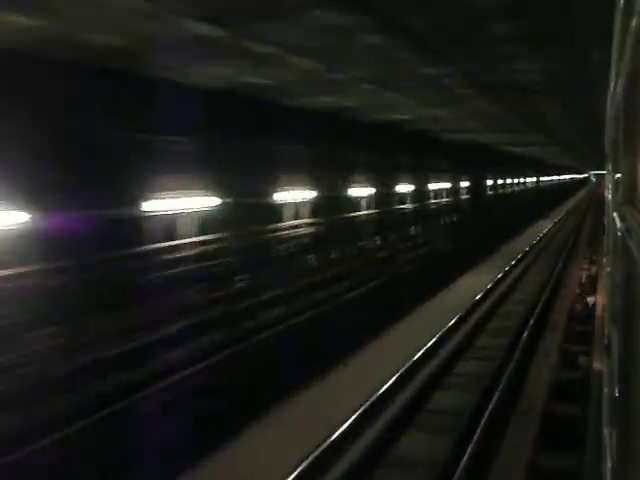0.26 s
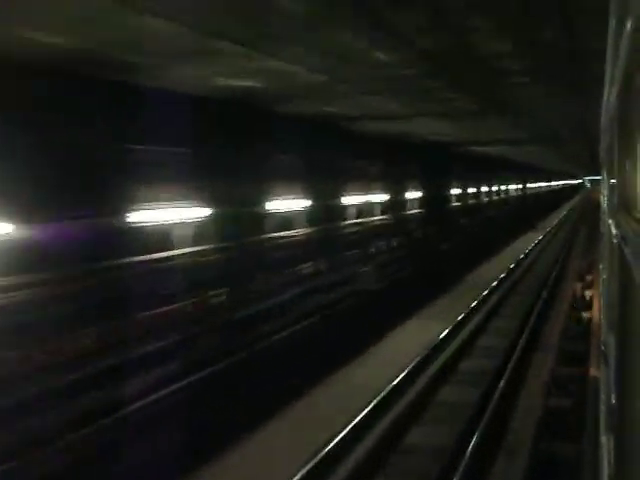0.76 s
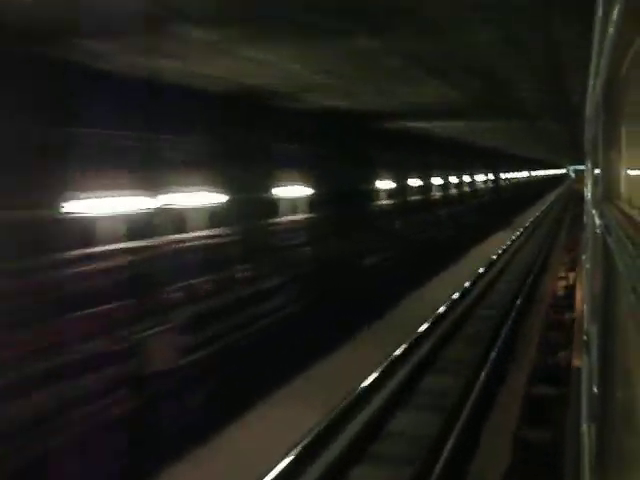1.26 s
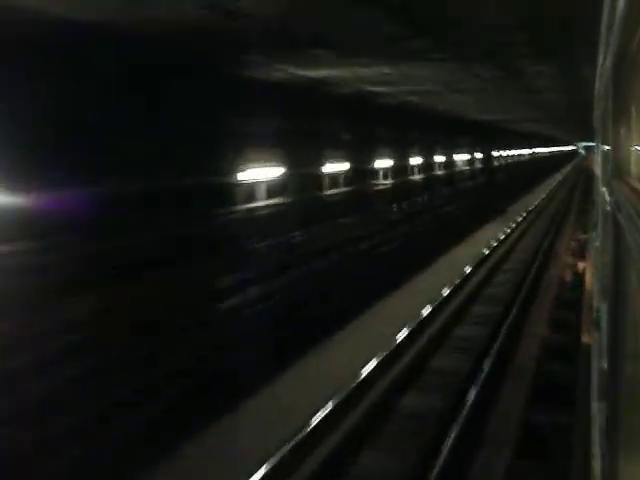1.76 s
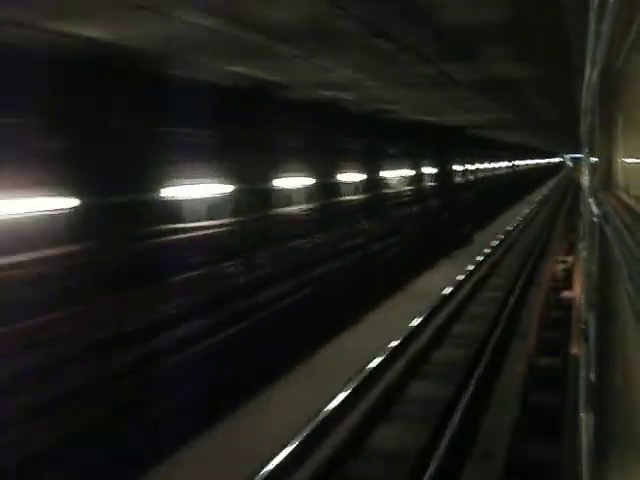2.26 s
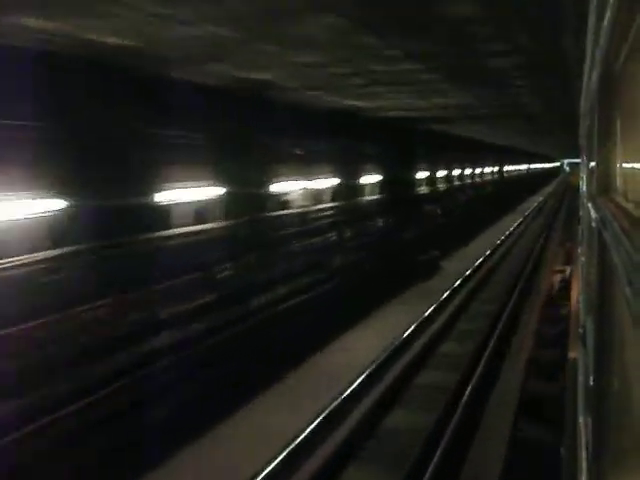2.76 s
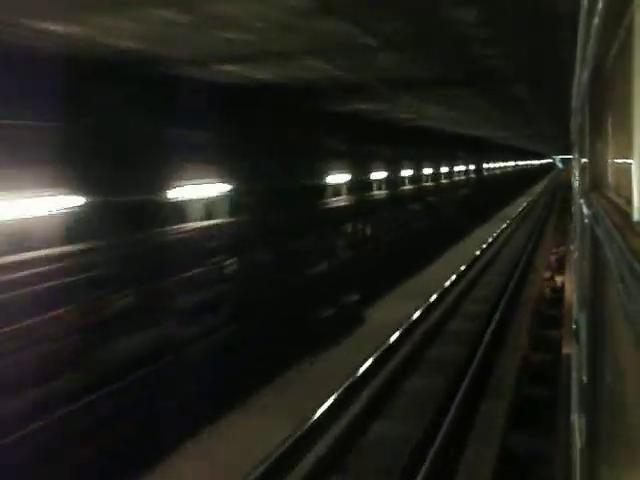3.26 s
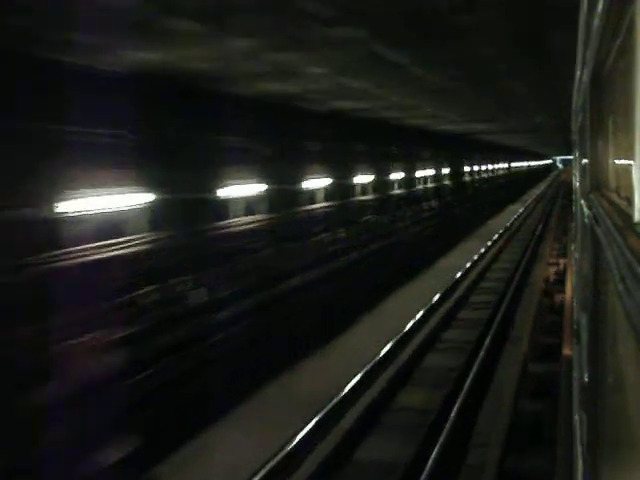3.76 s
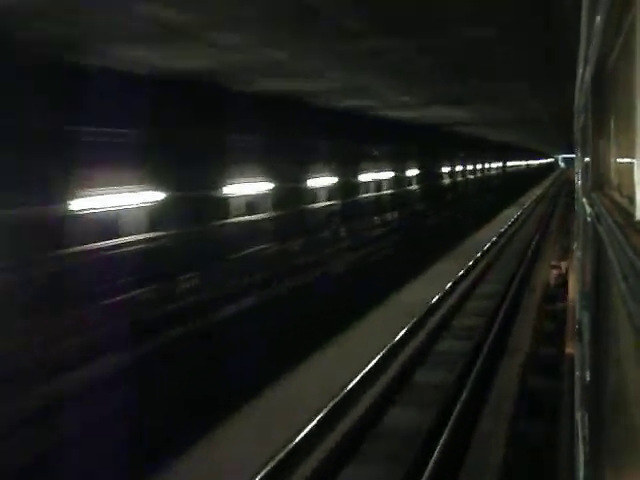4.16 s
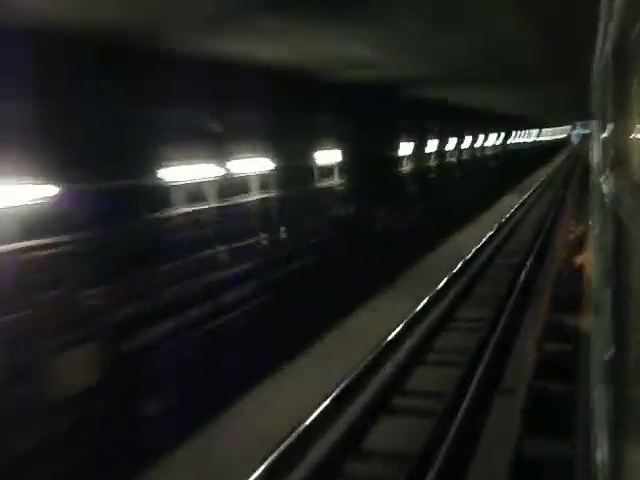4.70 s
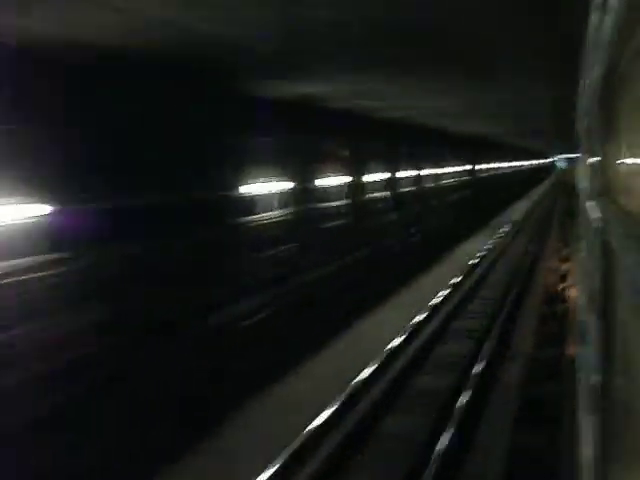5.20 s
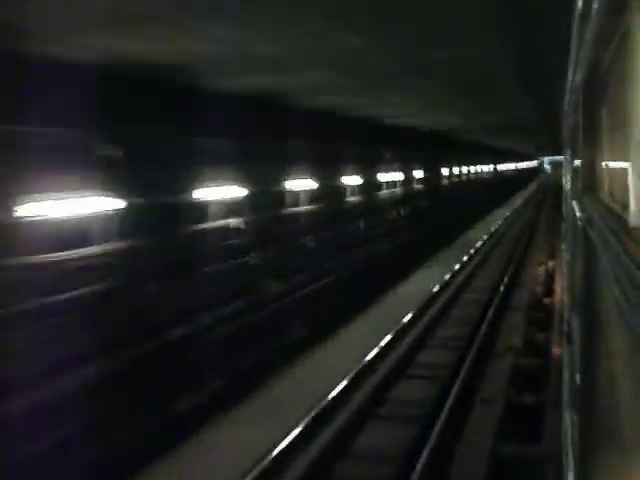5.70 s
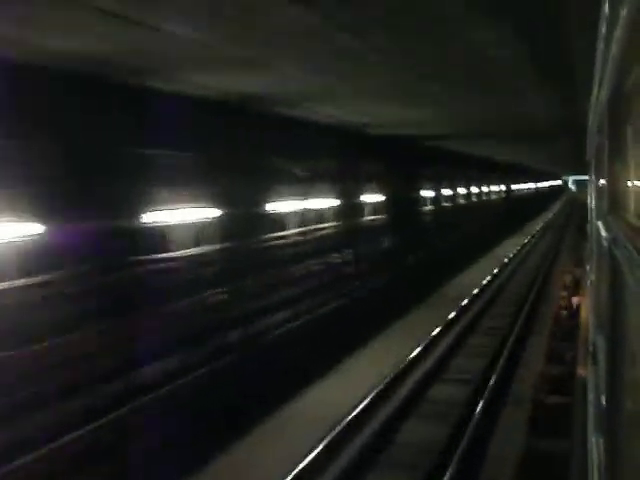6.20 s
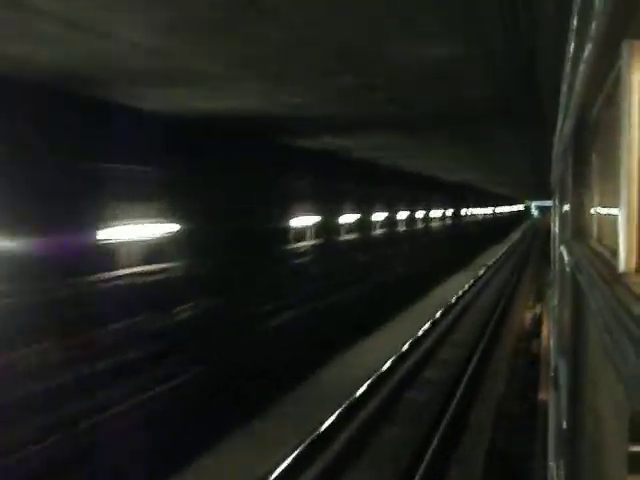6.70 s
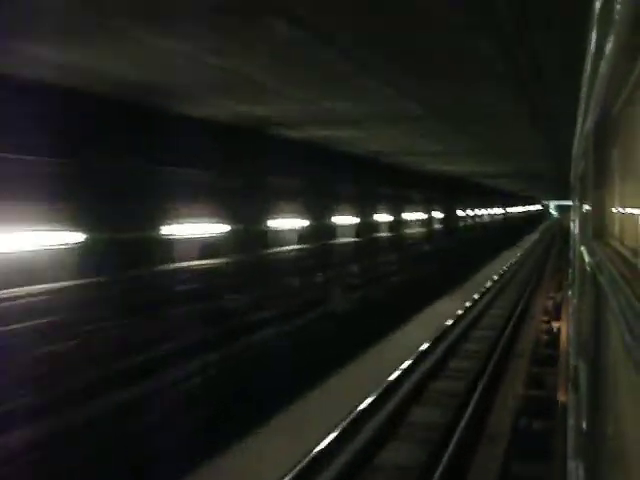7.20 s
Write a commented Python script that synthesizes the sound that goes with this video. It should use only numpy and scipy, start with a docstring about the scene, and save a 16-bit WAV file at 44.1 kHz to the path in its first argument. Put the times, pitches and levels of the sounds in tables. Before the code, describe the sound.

Inside a tunnel, a speeding metro train roars and rumbles, its pitch slowly climbing, while wind buffets, crackles and pops on the microphone.

```python
"""Metro tunnel: a train slowly gathers speed, with the microphone held out in the slipstream.
Wheels on rails give a roar, noise bands whose pitch climbs with the speed, over a rumble of filtered noise.
The air buffets the bass, rushes as fluttering noise, and breaks on the microphone in crackles and pops.
Fast gain control steadies the level; one faint bright tick sounds."""
import sys
import numpy as np
from scipy import signal
from scipy.fft import rfft, irfft
from scipy.io import wavfile

SR = 44100
rng = np.random.default_rng(int(sys.argv[2]) if len(sys.argv) > 2 else 0)


def waveform_to_disk(signal):
    """Save audio, clipped to [-1, 1], as 16-bit WAV at the path in sys.argv[1]."""
    frames = np.transpose(np.atleast_2d(signal))
    scaled = np.clip(frames, -1, 1) * 32767
    samples = np.round(scaled).astype(np.int16)
    wavfile.write(sys.argv[1], SR, samples)


N = 328545
TIME_S = np.arange(N) / SR
BAND_HZ = 5850


def amp(db):
    """Decibels to gain."""
    return 10 ** (np.asarray(db) / 20)


def evened(x):
    """Scales to an rms of one."""
    return x / np.sqrt(np.mean(x ** 2) + 1e-20)


def along(points):
    """Interpolates a (t/s, value) table at every sample."""
    return np.interp(TIME_S, *np.transpose(points))


def coloured(x, points):
    """Filters by a short spectrum, rolled off at the band edge; white noise keeps its power."""
    points_hz, points_db = np.transpose(points)
    hz = np.fft.rfftfreq(N, 1 / SR)
    gain = amp(np.interp(np.log(hz + 1), np.log(points_hz), points_db))
    gain /= np.sqrt(1 + (hz / BAND_HZ) ** 8)
    return irfft(rfft(x) * evened(gain), N)


def wander(rate_hz):
    """Smooth random signal of unit rms: white noise low-passed at about the given rate."""
    hz = np.fft.rfftfreq(N, 1 / SR)
    spectrum = rfft(rng.standard_normal(N)) / (1 + (hz / rate_hz) ** 2)
    return evened(irfft(spectrum, N))


def hump(centre_s, length_s):
    """A smooth rise to one and back."""
    return np.interp(TIME_S, centre_s + length_s * np.linspace(-.5, .5, 33), np.hanning(33))


def add(mix, centre_s, sound):
    """Mixes a sound in, centred on the given time."""
    start = max(round(centre_s * SR) - len(sound) // 2, 0)
    part = mix[start:][:len(sound)]
    part += sound[:len(part)]


# main pitch of the rolling roar, follows the train speed: (t/s, f/Hz)
SPEED = [(0, 490.3), (1.1, 520.7), (2, 537.7), (3, 564.1), (4.2, 575.3), (5, 612.2), (6.1, 619.7),
         (7.45, 628)]
# roar resonances: (multiple of main pitch, nominal width/Hz, level/dB)
ROAR = [(.7, 80.2, -36), (.87, 90.4, -29.5), (1, 75.7, -26), (1.19, 81.2, -32.5), (1.86, 125, -37)]
# roar level along smoother and rougher rail: (t/s, change/dB)
RAIL = [(0, 0), (1.2, 1), (2.3, -1.2), (3.5, -1.5), (5.1, 0), (5.6, -4.5), (6.1, 3), (7.45, 0)]


def roar(swell_db=0.6, swell_hz=3, top_fade_db_per_s=-1.6):
    """Rough wheels on rippled rail: noise bands whose pitch follows the speed, swelling at random."""
    turns = np.cumsum(along(SPEED)) / SR
    out = np.zeros(N)
    for multiple, width_hz, db in ROAR:
        roughness = wander(width_hz * 0.68) + 1j * wander(width_hz * 0.81)
        band = (roughness * np.exp(2j * np.pi * multiple * turns)).real
        # only the top band fades
        is_top = multiple == ROAR[-1][0]
        fade_db = top_fade_db_per_s * (TIME_S - TIME_S.mean()) * is_top
        out += amp(db + fade_db) * band
    return out * amp(along(RAIL) + swell_db * wander(swell_hz))


def speed_octaves():
    """Train speed in doublings about its mean, from the roar pitch."""
    octaves = np.log2(along(SPEED))
    return octaves - octaves.mean()


# tunnel rumble spectrum: (f/Hz, relative spectral level/dB)
RUMBLE = [(10, -5.5), (28, -0.5), (70, 0.5), (150, -1.5), (172, -2.5), (200, 1.5), (260, -1), (320, -2),
          (425, 1.5), (620, -3), (830, -10), (1080, -12), (1400, -21), (3000, -32.5), (6000, -50)]


def rumble(level_db=-17.5, buffet_hz=160, buffet_db=0.64):
    """Dense tunnel rumble: shaped noise whose bass heaves with the buffeting air."""
    noise = coloured(rng.standard_normal(N), RUMBLE)
    lowpass = signal.butter(2, buffet_hz, fs=SR, output="sos")
    bass = signal.sosfiltfilt(lowpass, noise)
    heaving_bass = bass * amp(buffet_db + buffeting())
    return amp(level_db) * (noise - bass + heaving_bass)


# gusts (+) and lulls (-) of the slipstream: (centre t/s, length/s, change/dB)
GUSTS = [(0.13, 0.2, -11), (0.87, .2, -8), (2.22, 0.18, -2), (2.71, 0.066, 6), (3.973, .16, 6),
         (4.216, .26, -5), (5.57, 0.18, -3.5), (7.017, 0.19, -7)]


def buffeting(speed_db_per_octave=4, heave_db=3.0, heave_hz=5):
    """Slipstream push in dB: grows with speed, heaves at random, has gusts and lulls."""
    gusts_db = sum(db * hump(s, length_s) for s, length_s, db in GUSTS)
    return speed_db_per_octave * speed_octaves() + heave_db * wander(heave_hz) + gusts_db


# individually timed eddies breaking on the microphone: (centre t/s, relative strength/dB, length/s)
CRACKLES = [(0.412, -22, 0.0033), (0.45, -21.5, .0034), (0.637, -11.5, .0023), (0.784, -23, .0037),
            (1.162, -20, .0037), (1.395, -24, .0034), (1.65, -21, .0023), (1.817, -17, .0038),
            (1.842, -22.5, .005), (2.041, -21, .0039), (2.058, -21, .0027), (2.645, -15, .0031),
            (2.747, -21, .0046), (3.368, -19.5, .005), (3.493, -20.5, .004), (3.992, -17, .0039),
            (4.138, -19, .0031), (4.379, -18, .0037), (4.664, -20, .004), (4.696, -21, 0.0034),
            (4.89, -15.5, .002), (5.157, -22, .004), (5.296, -17, .0039), (5.463, -16, .0031),
            (5.567, -18, .0035), (5.741, -20, .0053), (6.056, -16.5, .0034), (6.15, -18.5, .0027),
            (6.302, -18.5, .0029), (6.601, -17, .0044), (6.64, -17, .0037), (6.789, -23, 0.0078),
            (7.013, -15.5, .0027), (7.085, -14.5, .0052), (7.27, -17, .003)]
# crackle spectrum: (f/Hz, relative spectral level/dB)
TEARING = [(300, -5.5), (1000, 4.5), (1900, 3), (3000, -3), (4000, -3), (5200, -11), (6000, -20)]


def crackle(air_db, strong_db=1.0, weak_db=-31, spread_db=2.5, cap_db=-20.0, weak_mean_s=.002,
            gust_share=0.59, grain_db=4, snap_energy_ratio=0.28, count=400):
    """Eddies break on the microphone: a sharp snap in a grainy rasp of milliseconds, some strong, many weak."""
    when, size, length = rng.random((count, 3)).T
    weak_s = when * TIME_S[-1]
    # exponential spread of levels, lifted by rougher air
    weak_level_db = weak_db + gust_share * np.interp(weak_s, TIME_S, air_db)
    weak_level_db -= spread_db * np.log(1 - size)
    weak = np.transpose([weak_s, np.minimum(weak_level_db, cap_db), weak_mean_s * (.5 + length)])
    strong = np.array(CRACKLES) + [0, strong_db, 0]
    out = np.zeros(N)
    for at_s, db, length_s in np.vstack([strong, weak]):
        samples = int(np.clip(length_s * SR, 32, 1024))
        air, grain = rng.standard_normal((2, samples))
        rasp = evened(air * amp(grain_db * grain) * signal.windows.tukey(samples, .3))
        # one-sample snap, energy relative to the rasp
        rasp[samples // 2] += rng.choice([-1, 1]) * np.sqrt(snap_energy_ratio * samples)
        add(out, at_s, amp(db) * evened(rasp))
    return coloured(out, TEARING)


def turbulence(speed_db_per_octave=0.5, churn_db=1.32, churn_hz=7, flurry_s=0.2, flurry_db=0.5):
    """Air roughness in dB: grows with speed, churns at random, flares around each timed crackle."""
    flurries = np.max([hump(s, flurry_s) for s, _, _ in CRACKLES], axis=0)
    steady_db = speed_db_per_octave * speed_octaves() + churn_db * wander(churn_hz)
    return steady_db + flurry_db * (flurries - flurries.mean())


# individually timed blunt pressure pops: (centre t/s, relative level/dB)
POPS = [(0.297, 1), (0.508, -5), (1.043, -2), (1.057, 1.5), (1.709, -1.5), (1.757, -2), (2.292, -1),
        (2.323, -4), (2.487, 1.5), (2.549, 1), (3.462, 0.5), (3.495, -1), (4.36, -2), (5.125, -0.5),
        (6.454, -1.5), (7.323, -1)]


def pop(strong_db=1, weak_db=-8, spread_db=2.5, cap_db=-2, nominal_width_s=0.00034, rebound=0.36, count=290):
    """Eddies slap the diaphragm in or out: single pulses about a millisecond wide, a few hard."""
    when, size = rng.random((count, 2)).T
    weak_level_db = np.minimum(weak_db - spread_db * np.log(1 - size), cap_db)
    weak = np.transpose([when * TIME_S[-1], weak_level_db])
    strong = np.array(POPS) + [0, strong_db]
    t_s = np.arange(-128, 129) / SR
    out = np.zeros(N)
    for at_s, db in np.vstack([strong, weak]):
        u = t_s / (nominal_width_s * rng.uniform(0.62, 1.34))
        pulse = (1 - rebound * u ** 2) * np.exp(-u ** 2 / 2)
        add(out, at_s, rng.choice([-1, 1]) * amp(db) * pulse)
    return out


# rushing air spectrum: (f/Hz, relative spectral level/dB)
RUSH = [(300, -3.5), (1000, 5.5), (2000, 3.5), (3000, -1), (4200, -8.5), (5200, -14.5), (6000, -32.5)]


def rush(air_db, level_db=-34, flutter_db=4.0, flutter_hz=140):
    """Air rushes past the microphone: noise that follows the turbulence and flutters at random."""
    flow_db = level_db + air_db + flutter_db * wander(flutter_hz)
    return coloured(rng.standard_normal(N) * amp(flow_db), RUSH)


def scene(flutter_db=1.56, flutter_hz=70):
    """Tunnel and slipstream at one microphone; the tunnel's sound flutters at random."""
    tunnel = (roar() + rumble()) * amp(flutter_db * wander(flutter_hz))
    air_db = turbulence()
    return (tunnel + crackle(air_db) + pop() + rush(air_db))[None]


# one faint bright tick: (t/s, level/dB)
TICK = (3.719, -26)


def record(dry, threshold_db=-19, squeeze=0.69, settle_s=0.012, makeup_db=3.0, knee=0.76, ceiling=.71,
           edge_hz=15850):
    """Fast gain control, soft overload, narrow band, hard clipping, a tick, final band limit."""
    keep = np.exp(-1 / (settle_s * SR))
    power = signal.lfilter([1 - keep], [1, -keep], dry[0] ** 2, zi=[np.mean(dry ** 2)])[0]
    over_db = np.maximum(10 * np.log10(power + 1e-12) - threshold_db, 0)
    held = dry[0] * amp(makeup_db - squeeze * over_db)
    rounded = held / (1 + (held / knee) ** 6) ** (1 / 6)
    band_filter = signal.firwin(181, BAND_HZ, window=("kaiser", 8), fs=SR)
    narrow = signal.oaconvolve(rounded, band_filter, "same")
    # clipped peaks leave tiny ticks in the empty treble
    out = np.clip(narrow, -ceiling, ceiling)
    tick_s, tick_db = TICK
    add(out, tick_s, amp(tick_db) * np.array([1, -1]))
    edge_filter = signal.firwin(511, edge_hz, window=("kaiser", 9), fs=SR)
    return signal.oaconvolve(out, edge_filter, "same")[None]


dry = scene()
out = record(dry)
waveform_to_disk(out)
```